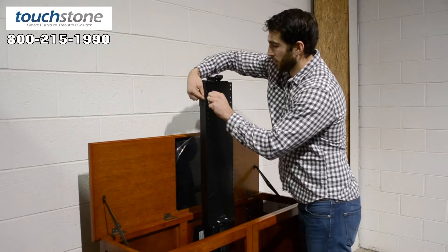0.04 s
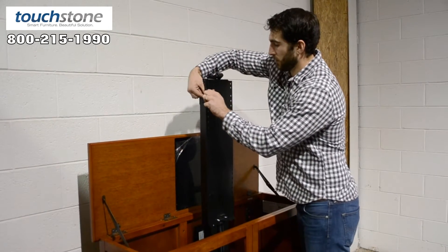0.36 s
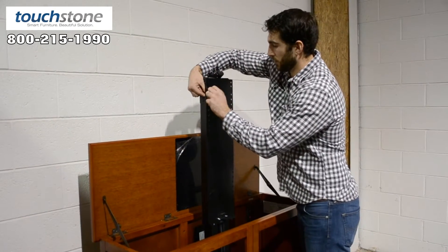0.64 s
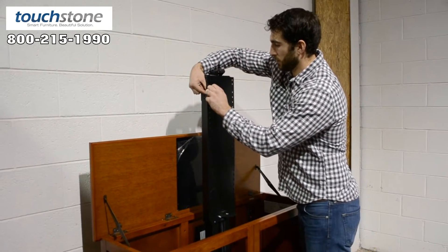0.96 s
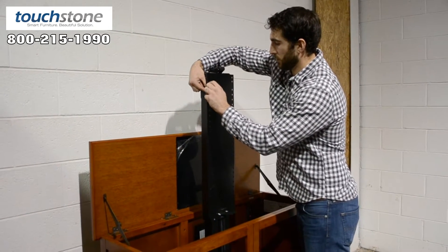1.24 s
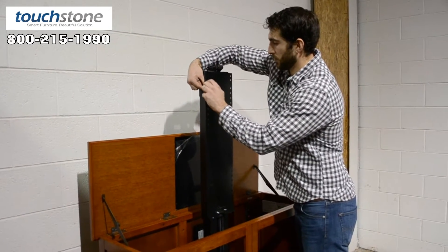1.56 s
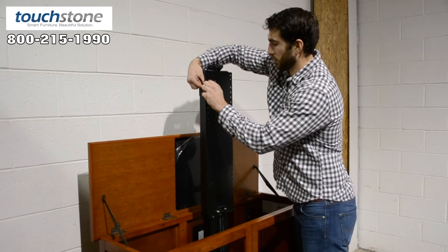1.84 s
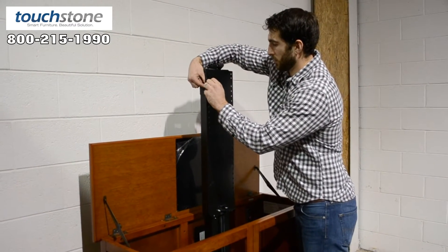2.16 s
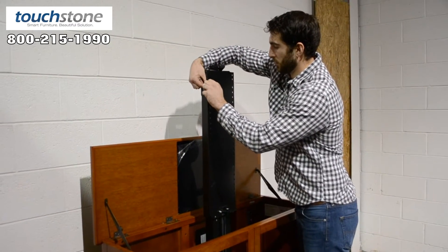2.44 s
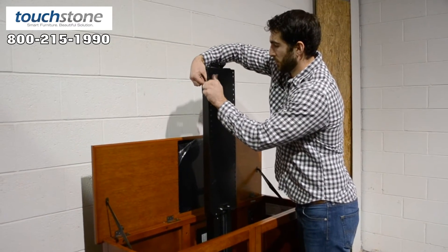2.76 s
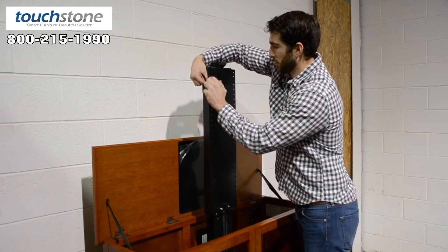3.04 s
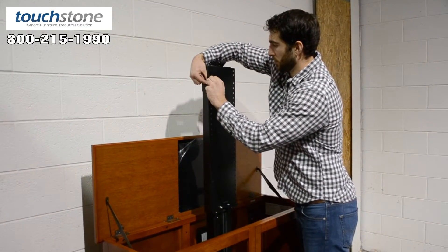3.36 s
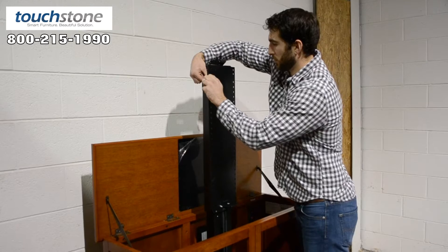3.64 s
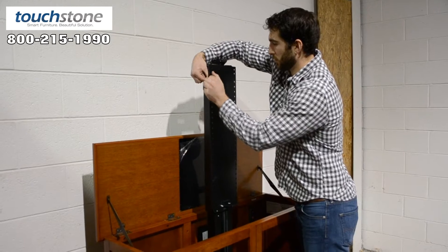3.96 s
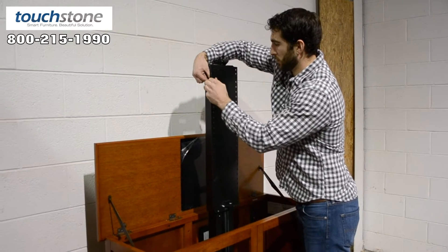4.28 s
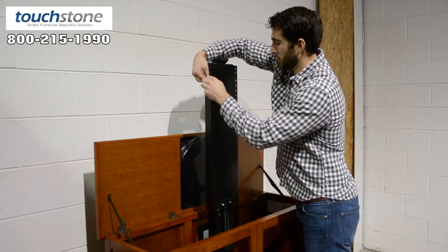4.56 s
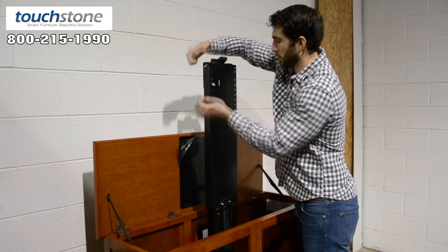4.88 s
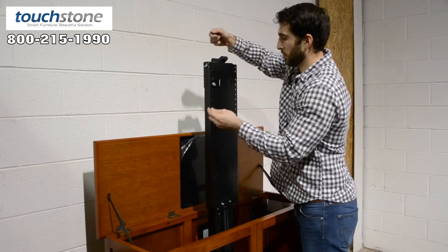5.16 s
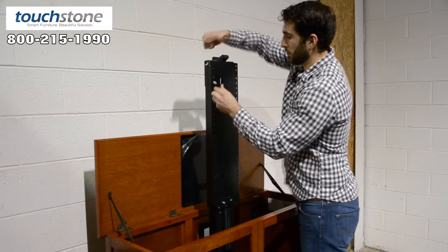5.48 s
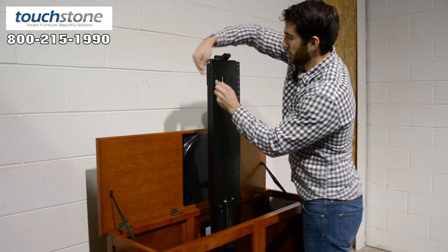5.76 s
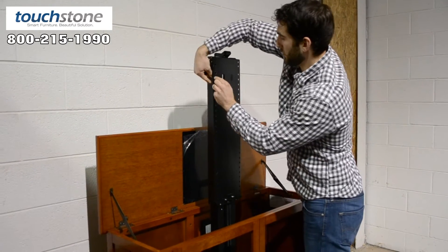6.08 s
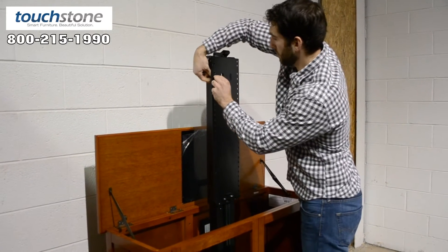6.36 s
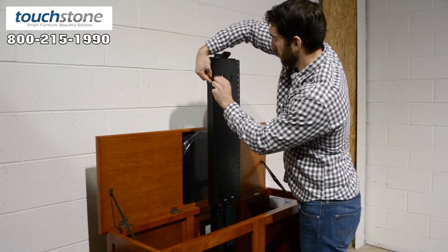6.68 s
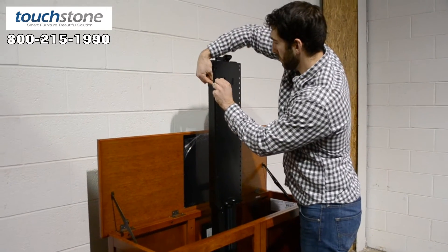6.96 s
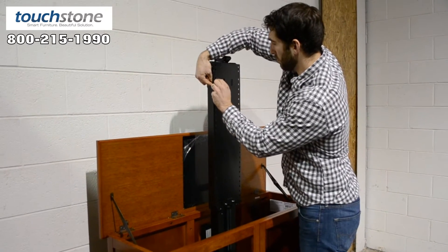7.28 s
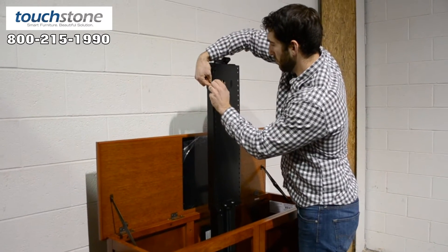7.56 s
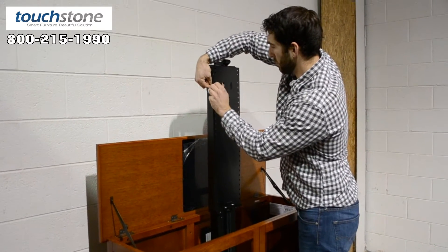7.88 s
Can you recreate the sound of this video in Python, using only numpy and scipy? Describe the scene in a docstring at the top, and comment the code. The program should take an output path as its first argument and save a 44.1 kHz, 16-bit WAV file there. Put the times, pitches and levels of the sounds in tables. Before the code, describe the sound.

In a hard-walled room with a faint electrical hum, a lift motor runs with a pulsing gear whine and hiss, a few light metal taps over it. It brakes with a short knock. Then hardware is handled on a steel column, giving a cluster of ringing clanks, small clicks and one sharp snap of a clip. More clanks come after, and it ends with soft metal scraping and a click.

```python
"""A hard-walled room: a geared motor drives a steel lift column in a wooden cabinet, then brakes.
Shaft tones, gear whine and brush hiss follow one shaft; the gearbox clunks as it stops.
Hands work a pin and bracket at the top of the column: the steel clatters and rings, small parts
click, scrape and squeak, a spring clip snaps shut. The room rings after each knock;
mains hum and air noise go on throughout."""
import sys
import numpy as np
from scipy import signal
from scipy.fft import rfft, irfft, next_fast_len
from scipy.io import wavfile

SR = 44100
rng = np.random.default_rng(int(sys.argv[2]) if len(sys.argv) > 2 else 0)


def store_pcm(level_fs):
    """Save levels as 16-bit WAV."""
    pcm = np.round(np.clip(level_fs, -1, 1) * 32767).astype(np.int16)
    wavfile.write(sys.argv[1], SR, np.atleast_2d(pcm).T)


N = 353682
TIME = np.arange(N) / SR

# shaft tones: multiple of shaft speed, level/dB
SHAFT_ORDERS = [(2, -79), (4, -54), (5, -73.5), (8, -78), (10, -63), (16, -69.5), (17, -87), (30, -63.5),
                (40, -66.5), (50, -95), (60, -74.5), (68, -75.5), (70, -76.5)]
def motor(shaft_hz=56.63, cut_s=2.884, brake_s=.09, bite=1.4, drive_db=1):
    """One shaft carries tones, whine and hiss; pitch and level fall once the power is cut."""
    speed = np.exp(-(np.maximum(TIME - cut_s, 0) / brake_s) ** bite)  # share of full speed
    angle = 2 * np.pi * np.cumsum(shaft_hz * speed * (1 + .00082 * drift(8.1))) / SR
    tones = np.zeros(N)
    for order, db in SHAFT_ORDERS:
        waver_db = 2.5 * min(order / 20, 1) * drift(3.1)
        tones += amp(db + waver_db) * np.sin(order * angle + 2 * np.pi * rng.random())
    drive = amp(drive_db) * speed ** 2.1
    tonal = drive * np.sqrt(2) * (tones * speed ** 2 + gear_whine(angle, speed) * speed)
    chop = 1 + .17 * np.cos(10 * angle) + .11 * np.cos(2 * angle)  # ten commutator bars
    hiss = drive * chop * (gear_rub(angle) + brushes(speed))
    return tonal + amp(-2.5) * hiss + amp(-7) * room(hiss)


# gear whine along the travel: t/s, level/dB, dip depth/dB
WHINE_PATH = [(0, -41.5, 0.5), (.8, -42.5, 4), (1.5, -46.5, 8.5), (2.15, -50.5, 12), (2.55, -48.5, 6),
              (2.88, -47, 13)]
def gear_whine(angle, speed, screw_hz=2.917, first_dip_s=.252, strain_db=13, lash_rad=4):
    """The mesh eases once per screw turn; under braking the teeth strain and rattle in their play."""
    at_s, level_db, depth_db = np.transpose(WHINE_PATH)
    dip = abs(np.cos(np.pi * screw_hz * (TIME - first_dip_s))) ** 8.2
    mesh_db = np.interp(TIME, at_s, level_db) - np.interp(TIME, at_s, depth_db) * dip
    braking = 1 - speed
    strain = np.minimum(braking / .16, 1)
    gain = amp(mesh_db + strain_db * strain - 2 + .48 * drift(25))
    return gain * np.sin(20 * angle + lash_rad * braking * drift(90))


# gear and brush noise: f/Hz, density/dB
RUB_SPECTRUM = [(100, -29), (200, 1), (450, 1), (900, 9), (1300, 1), (1800, 4.5), (2500, -5), (3400, -9.5),
                (4000, -6.5), (5000, -13.5), (7800, -13.5), (10000, -22), (11200, -14.5), (12000, -48)]
def gear_rub(angle, gain_db=-53):
    """The gears rub a little harder once a shaft turn."""
    rub = amp(gain_db) * noise(lambda f: amp(read(RUB_SPECTRUM, f)))
    return rub * (1 + .1 * np.cos(angle) + .25 * drift(20))


# brush whistles: f/Hz, width/Hz, level/dB
BRUSH_WHISTLES = [(2830, 70, -70), (3400, 30, -74), (3860, 50, -69), (5630, 120, -70), (6180, 80, -75),
                  (6750, 70, -68), (7330, 170, -72), (8320, 60, -75), (8450, 120, -70), (9000, 170, -74),
                  (9530, 120, -72), (10150, 140, -79), (10680, 90, -85)]
def brushes(speed):
    """The brushes whistle with jittering pitch and fade as the shaft slows."""
    out = np.zeros(N)
    for hz, width_hz, db in BRUSH_WHISTLES:
        pitch_hz = hz * speed + .5 * width_hz * drift(102)
        out += amp(db) * np.sqrt(2) * np.sin(2 * np.pi * np.cumsum(pitch_hz) / SR)
    return out * speed ** 2


# gearbox knock: f/Hz, density/dB
CLUNK_SPECTRUM = [(120, -31), (220, -1), (350, -6), (500, 1), (750, -2), (1000, -6.5), (1500, -5.5),
                  (2500, -16), (4000, -18), (9000, -37), (12000, -46.5)]
def clunk(at_s=2.91, level_db=-40.5, swell_s=.013, t60_s=.11):
    """The gearbox takes up its play as it stops: one dull, short knock."""
    t, out = np.arange(16384) / SR, np.zeros(N)
    body = noise(lambda f: amp(read(CLUNK_SPECTRUM, f)), len(t))
    add(out, at_s, amp(level_db) * body * swell_decay(t, swell_s, t60_s))
    return out + amp(-4) * room(out)


# modes of column and bracket: f/Hz, level/dB, t60/s
COLUMN_MODES = [(409, -7, .35), (515, -5, .3), (571, 2, .35), (721, -7, .5), (850, -10, .3), (958, -7, .35),
                (1028, 2, .3), (1500, -10, .35), (1647, -8, .45), (1725, -5, .45), (1776, 0, .5),
                (1870, -9, .4), (2005, -9, .55), (2309, -6, .55), (2474, -6, .45), (2536, -6, .4),
                (2630, -7, .45), (2821, -3.5, .5), (3213, -9, .4), (3481, -5, .45), (3903, -3, .3),
                (3984, -5, .45), (4510, -7, .4), (4640, -8, .35), (4755, -5, .3), (5000, -5, .45),
                (5351, -11, .35), (7400, -4, .1), (7540, -1, .09), (8400, -17, .3)]
def steel(f, width_hz=42, lift_db=6):
    """Gain of the column: its modes stand out of a flat response."""
    return 1 + amp(lift_db) * sum(amp(db) * resonance(f, hz, width_hz) for hz, db, _ in COLUMN_MODES)


def column_ring(t, band_hz, band_db, swells_s):
    """The modes swell and ring on; each blow shares its force among them anew."""
    scatter_db = 2 * rng.standard_normal(len(COLUMN_MODES))
    out = np.zeros(len(t))
    for (hz, db, t60_s), offset_db in zip(COLUMN_MODES, scatter_db):
        force_db = read(list(zip(band_hz, band_db)), hz) + offset_db
        rise = 1 - np.exp(-t / read(list(zip(band_hz, swells_s)), hz))
        out += rise * amp(db + force_db - 60 * t / t60_s) * np.cos(2 * np.pi * (hz * t + rng.random()))
    return out


# dense clatter of the steel: low/Hz, high/Hz, swell/s, t60/s
CLATTER_BANDS = [(412, 1140, 0.029, 0.24), (945, 2060, 0.014, 0.17), (1580, 3260, 0.0098, 0.24),
                 (3090, 4520, 0.004, 0.12), (5060, 7770, .001, 0.057)]
# per clatter band: share of bass lift, share of treble lift
LIFT_SHARES = [(1, 0.011), (0.36, 0.049), (0.019, 0.033), (0, 0.69), (0.032, 0.76)]
# blows: t/s, strength/dB, bass lift/dB, treble lift/dB, free ring/dB (low when a hand damps the steel)
BLOWS = [ (0.127, -49, -5, -22, -12), (0.292, -41, -8.5, -15, -14), (0.686, -43, -29, -19, -6),
         (3.642, -47, -7, -34, 9), (3.7925, -37.5, -10, -15, 0), (4.2246, -39, -21, -36, -8),
         (4.336, -33.5, -12.5, -5, 3.5), (4.346, -38.5, -10, -10, -4), (4.372, -40.5, -9.5, 1, -8),
         (4.419, -39, -5, -16, 3), (4.4544, -28, -7.5, 1, 3), (4.648, -33, -20.5, 5, -1.5),
         (6.085, -48, 2.5, -19, -7), (6.100, -48.5, 1.5, -19, 1), (6.325, -45.5, 1.5, -14.5, -16),
         (6.344, -37.5, 1, -35, -16), (6.402, -36, 0, -23.5, 3.5), (6.552, -55, -5, -20, -8)]
def knocks(ring_db=-8):
    """The tick comes at once; the lower bands swell as the blow spreads down the column."""
    t, clatter, ring = np.arange(32768) / SR, np.zeros(N), np.zeros(N)
    colour = steel(np.fft.rfftfreq(len(t), 1 / SR))
    lows_hz, highs_hz, swells_s, _ = np.transpose(CLATTER_BANDS)
    band_hz = np.sqrt(lows_hz * highs_hz)
    for at_s, strength_db, bass_db, treble_db, free_db in BLOWS:
        band_db = strength_db + np.array(LIFT_SHARES) @ [bass_db, treble_db]
        for (low_hz, high_hz, swell_s, t60_s), db in zip(CLATTER_BANDS, band_db):
            band = noise(lambda f: colour * passband(f, low_hz, high_hz), len(t))
            add(clatter, at_s, amp(db) * band * swell_decay(t, swell_s, t60_s))
        add(ring, at_s, column_ring(t, band_hz, band_db + free_db, swells_s))
    return clatter + amp(-9.5) * room(clatter) + amp(ring_db) * ring


# spring clip resonances: f/Hz, width/Hz, level/dB
CLIP_MODES = [(1700, 500, -15), (2500, 700, -15), (3200, 400, -12), (4150, 550, -4), (6100, 950, 0),
              (9100, 1400, -12), (11000, 400, -8), (13100, 400, -11)]
def clip_snap(at_s=5.3098, gain_db=-20.5, crack_t60_s=.005, ring_t60_s=.028):
    """The spring clip gives one hard crack and a brief ring; it is too small to give bass."""
    t, out = np.arange(4096) / SR, np.zeros(N)
    decay = amp(-60 * t / crack_t60_s) + amp(-12 - 60 * t / ring_t60_s)
    crack = burst(lambda f: sum(amp(db) * resonance(f, hz, width) for hz, width, db in CLIP_MODES), decay)
    add(out, at_s, amp(gain_db) * crack)
    out = signal.sosfilt(signal.butter(2, 1500, "highpass", fs=SR, output="sos"), out)
    return out + amp(-11.5) * room(out)


# hardware clicks: t/s, level/dB, f/Hz, width/octaves, t60/s
PART_CLICKS = [(0.129, -44.5, 2940, 0.22, 0.077), (0.181, -44, 3210, 0.58, .06),
               (1.164, -56, 8800, 0.21, .04), (1.281, -40.5, 4050, 0.1, 0.028),
               (1.284, -48, 8500, 0.45, 0.034), (1.608, -50.5, 2870, 0.19, 0.097),
               (1.779, -44, 2780, 0.16, 0.1), (4.777, -42, 8600, 0.94, 0.034),
               (4.796, -53, 8800, .4, 0.076), (4.850, -42, 9250, 0.79, 0.044),
               (4.863, -48, 8750, 0.86, 0.14), (5.171, -53, 5970, 0.39, 0.021),
               (5.191, -44.5, 5300, 0.67, 0.049), (5.489, -47, 4420, 0.78, 0.053),
               (5.49, -55, 2280, 0.041, 0.17), (5.665, -63, 8730, .4, 0.047),
               (7.1354, -43, 1390, 0.46, 0.021), (7.133, -43, 3380, 0.39, 0.017)]
def clicks():
    """Small parts snap together in the fingers, too light to ring the column."""
    t, out = np.arange(8192) / SR, np.zeros(N)
    for at_s, db, hz, octaves, t60_s in PART_CLICKS:
        add(out, at_s, amp(db) * burst(lambda f: hump(f, hz, octaves), amp(-60 * t / t60_s)))
    return out + amp(-9) * room(out)


# metal sliding on metal: middle t/s, half length/s, level/dB, f/Hz
SLIDES = [(1.012, 0.03, -56, 2490), (2.754, 0.042, -56.5, 1600), (4.456, 0.017, -41, 600),
          (6.094, 0.019, -49, 905), (6.319, 0.0076, -47, 990), (6.925, 0.055, -56.5, 814),
          (7.385, 0.047, -54.5, 1400), (7.753, 0.032, -50, 1360), (7.421, .04, -56, 700),
          (7.773, 0.051, -56.5, 550)]
def scrapes(octaves=.72, grain_db=2):
    """Uneven friction of the bracket, coloured by the column."""
    t, out = np.arange(16384) / SR, np.zeros(N)
    middle_s = t[-1] / 2
    for at_s, half_s, db, hz in SLIDES:
        rub = noise(lambda f: steel(f) * hump(f, hz, octaves), len(t))
        add(out, at_s - middle_s, amp(db) * rub * np.exp(-.5 * ((t - middle_s) / half_s) ** 2))
    out *= amp(grain_db * drift(150) - 2)
    return out + amp(-8) * room(out)


def pin_squeak(at_s=4.168, half_s=.027, top_hz=8520, sag_hz=280, level_db=-74):
    """The pin squeals faintly as it turns: one thin arch of pitch."""
    turn = np.clip((TIME - at_s) / half_s, -3, 3)
    pitch_hz = top_hz - sag_hz * turn ** 2
    return amp(level_db) * np.exp(-turn ** 4) * np.sin(2 * np.pi * np.cumsum(pitch_hz) / SR)


# strong hum lines: harmonic number, level/dB
HUM_LINES = [(2, -69.5), (4, -59.5), (6, -57), (7, -65), (12, -81.5), (14, -72.5), (18, -70.5), (20, -67),
             (24, -72), (28, -68), (38, -74.5), (58, -76), (70, -73.5), (92, -78), (94, -81.5)]
# fine buzz: f/Hz, level per line/dB
BUZZ_SPECTRUM = [(60, -91), (200, -86), (500, -80), (1500, -80.5), (2500, -80.5), (3600, -87), (4400, -84),
                 (5000, -88.5), (5500, -84.5), (6200, -93.5), (6800, -92), (7400, -101), (9000, -102),
                 (11000, -115)]
def mains(mains_hz=59.98, odd_cut_db=11, uneven_db=6, scatter_rad=1.28):
    """Strong low hum lines and a fine buzz that snaps twice in each mains cycle."""
    harmonics = np.arange(1, 185)
    db = read(BUZZ_SPECTRUM, harmonics * mains_hz) - odd_cut_db * (harmonics % 2)
    db += uneven_db * np.clip(rng.standard_normal(len(db)), -2, 2)
    for harmonic, level_db in HUM_LINES:
        db[round(harmonic) - 1] = level_db
    cycle = np.linspace(0, 1, 8192)
    phases = scatter_rad * rng.standard_normal((len(db), 1))
    wave = amp(db) @ np.cos(2 * np.pi * np.outer(harmonics, cycle) + phases)
    return np.sqrt(2) * np.interp(TIME * mains_hz % 1, cycle, wave) * amp(.81 * drift(1.8))


# air noise: f/Hz, density/dB
AIR_SPECTRUM = [(20, -5), (45, -13), (80, -4.5), (150, 3), (300, 3.5), (900, 3.5), (1700, -2), (2600, -7),
                (4200, -13.5), (5000, -15.5), (8000, -24.5), (10000, -28), (11200, -34), (12200, -47)]
def air(level_db=-58.5):
    """Steady wash of room air."""
    return amp(level_db + .11 * drift(2)) * noise(lambda f: amp(read(AIR_SPECTRUM, f)))


# room decay: f/Hz, t60/s
ROOM_DECAY = [(200, 1), (600, 0.75), (2000, 1), (4000, 0.76), (7000, 0.48), (11000, 0.37)]
# first wall echoes: delay/s, level re tail/dB
WALL_ECHOES = [(.0095, -8), (0.0155, -6), (.042, -5.5)]
def room(x):
    """A few distinct wall echoes and a tail of sparse reflections, each band dying at its own speed."""
    taps = np.zeros(SR)
    slots = np.arange(350, SR - 20, 20)
    taps[slots + rng.integers(0, 20, len(slots))] = rng.choice([-1., 1.], len(slots))
    hz, t, spectra = signal.stft(taps, SR, nperseg=256)
    tail = signal.istft(spectra * amp(-60 * t / read(ROOM_DECAY, hz)[:, None]), SR, nperseg=256)[1]
    tail /= np.linalg.norm(tail)
    for delay_s, db in WALL_ECHOES:
        add(tail, delay_s, [amp(db)])
    return signal.fftconvolve(x, tail / np.linalg.norm(tail))[:N]


def amp(db):
    """Decibels to gain."""
    return 10 ** (np.asarray(db) / 20)


def unit(x):
    """Scales to rms 1."""
    return x / np.sqrt(np.mean(x ** 2) + 1e-30)


def read(points, hz):
    """Interpolates a table on a log-frequency axis."""
    f, value = np.transpose(points)
    return np.interp(np.log(hz + 1), np.log(f), value)


def add(mix, at_s, sound):
    """Mixes a sound in, in place."""
    part = mix[max(round(at_s * SR), 0):][:len(sound)]
    part += sound[:len(part)]


def noise(shape, size=N):
    """Noise of rms 1 with spectral gain shape(f)."""
    n = next_fast_len(size)
    return unit(irfft(rfft(rng.standard_normal(n)) * shape(np.fft.rfftfreq(n, 1 / SR)), n)[:size])


def burst(shape, decay):
    """Decaying noise with the rms of its envelope."""
    return unit(noise(shape, len(decay)) * decay) * np.sqrt(np.mean(decay ** 2))


def drift(rate_hz):
    """Slow random wander, rms about 1."""
    steps = np.linspace(0, N / SR, 2048)
    rolloff = 1 + (np.fft.rfftfreq(len(steps), steps[1]) / rate_hz) ** 2
    return np.interp(TIME, steps, unit(irfft(rfft(rng.standard_normal(len(steps))) / rolloff)))


def swell_decay(t, swell_s, t60_s):
    """Linear rise, exponential fall."""
    return np.minimum(t / swell_s, 1) * amp(-60 * np.maximum(t - swell_s, 0) / t60_s)


def hump(f, hz, octaves):
    """A bell on the log-frequency axis."""
    return np.exp(-.5 * (np.log2((f + 1) / hz) / octaves) ** 2)


def resonance(f, hz, width_hz):
    """A peak of height 1."""
    return 1 / (1 + (2 * (f - hz) / width_hz) ** 2)


def passband(f, low_hz, high_hz):
    """Band gain, steeper on the low side."""
    return 1 / np.sqrt((1 + (low_hz / (f + 1)) ** 20) * (1 + (f / high_hz) ** 10))


def scene():
    """All sources, mono."""
    steady = motor() + clunk() + mains() + air()
    return (steady + knocks() + clicks() + clip_snap() + pin_squeak() + scrapes())[None]


def record(dry, edge_hz=15300):
    """The microphone is dull in the top treble; then the band limit."""
    hz = np.linspace(0, SR / 2, 513)
    colour = amp(read([(10400, -1.5), (11200, -19.5), (12200, -32), (13500, -13), (15000, -19)], hz))
    dull = signal.oaconvolve(dry, signal.firwin2(255, hz, colour, fs=SR)[None], "same")
    lowpass = signal.firwin(511, edge_hz, window=("kaiser", 9), fs=SR)
    return signal.oaconvolve(dull, lowpass[None], "same")


dry = scene()
out = record(dry)
store_pcm(out)
```